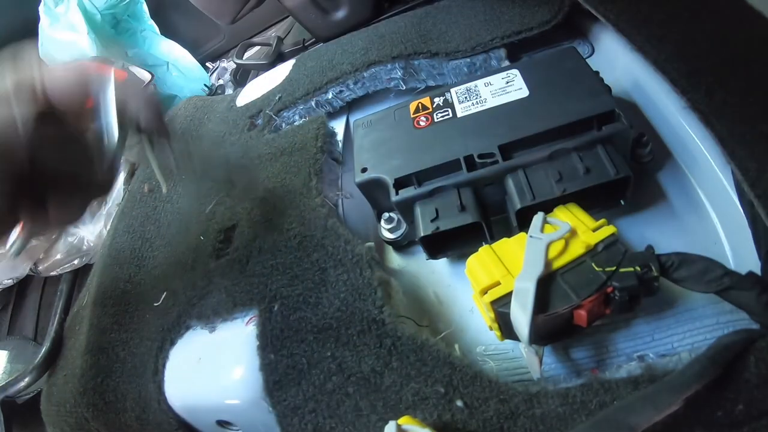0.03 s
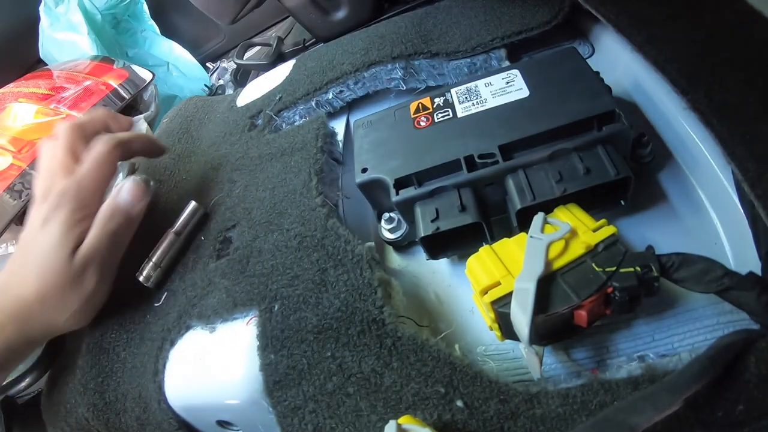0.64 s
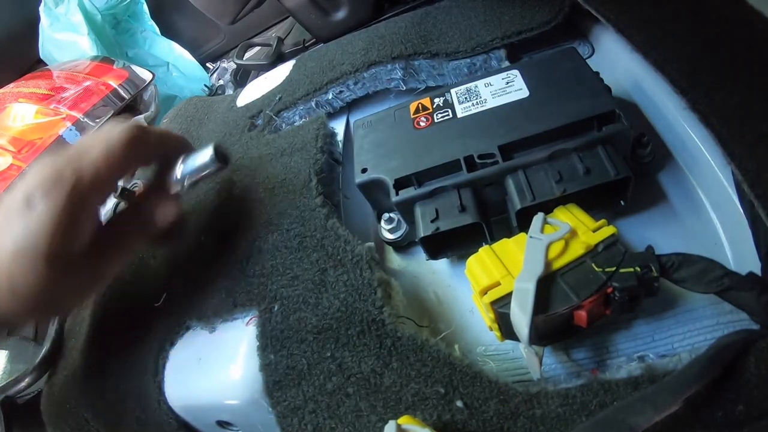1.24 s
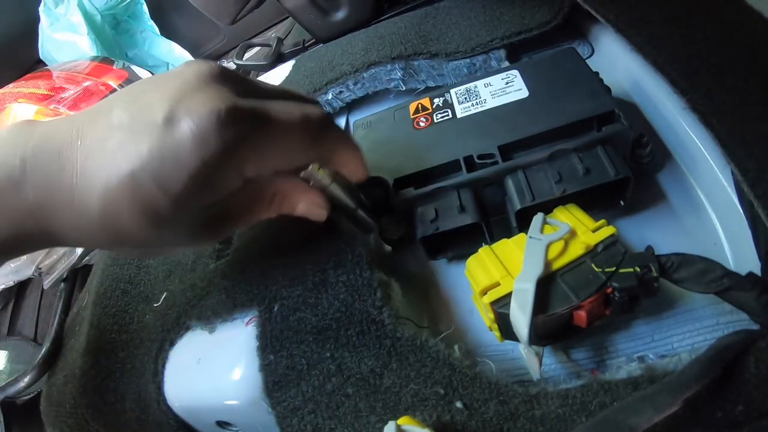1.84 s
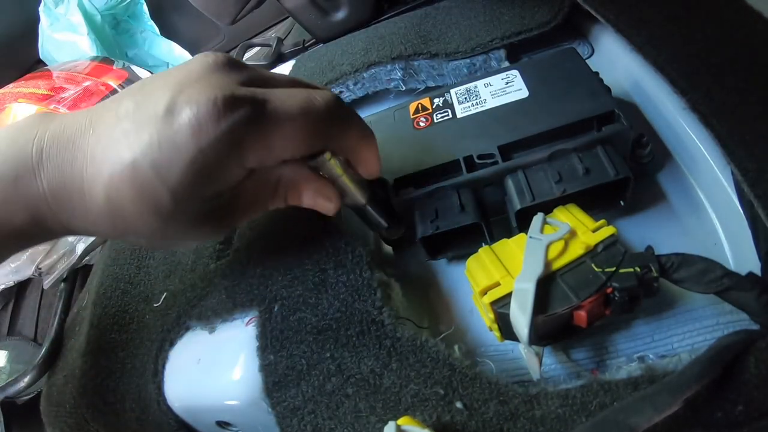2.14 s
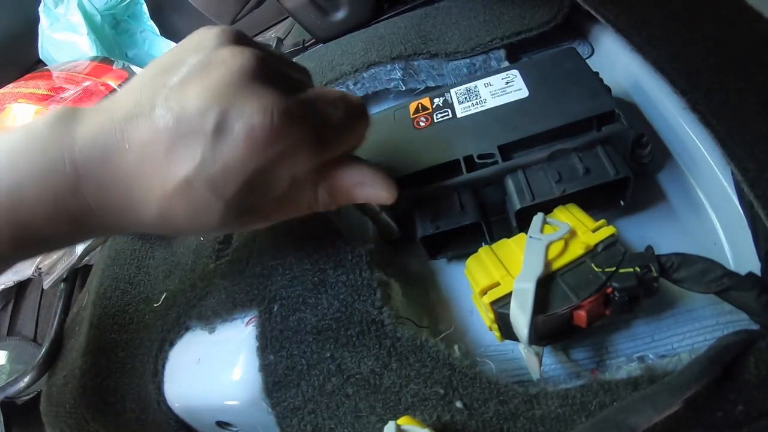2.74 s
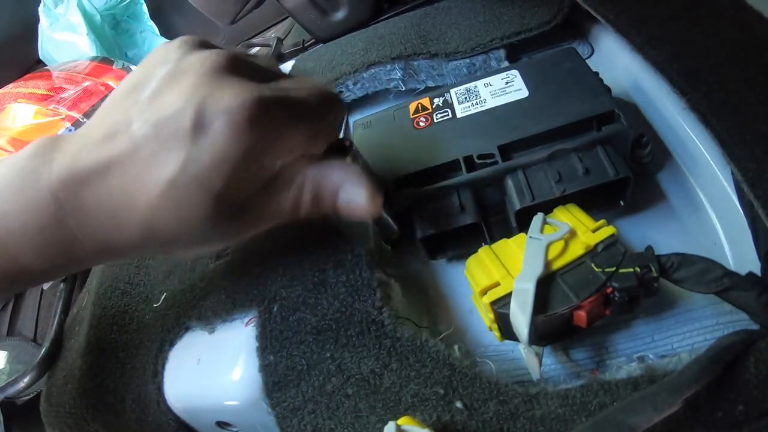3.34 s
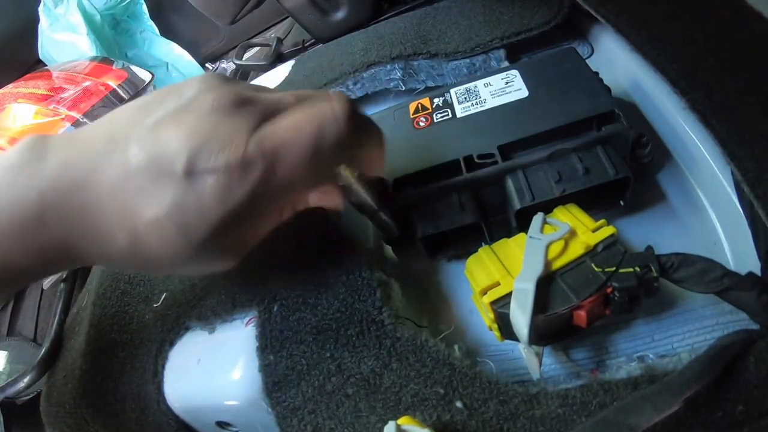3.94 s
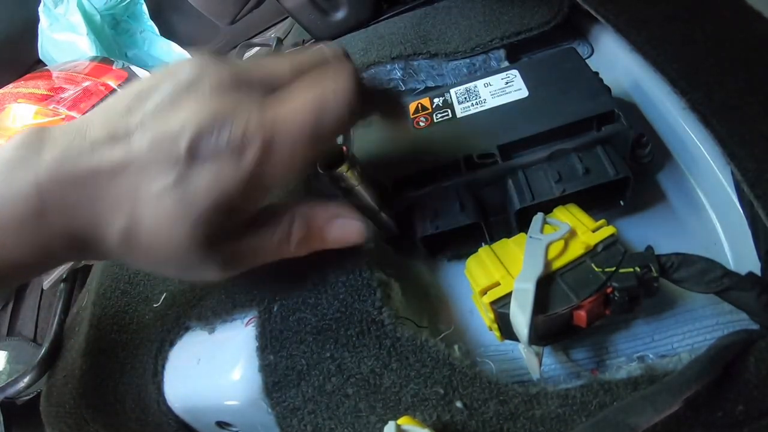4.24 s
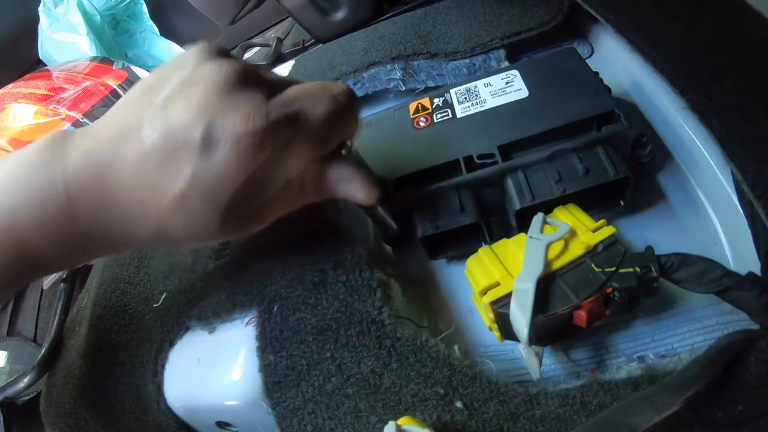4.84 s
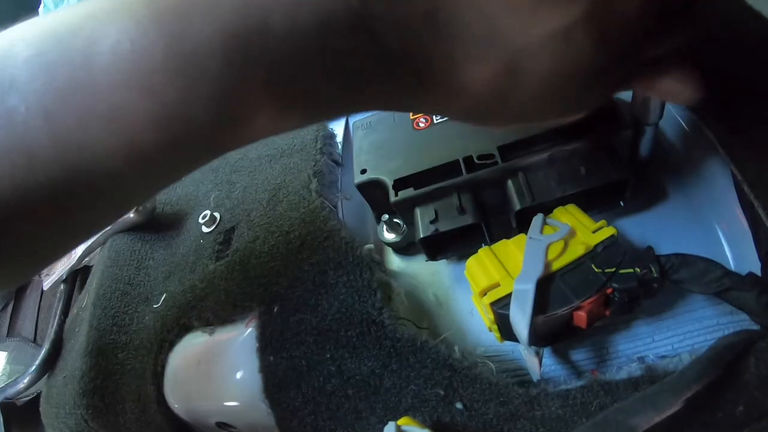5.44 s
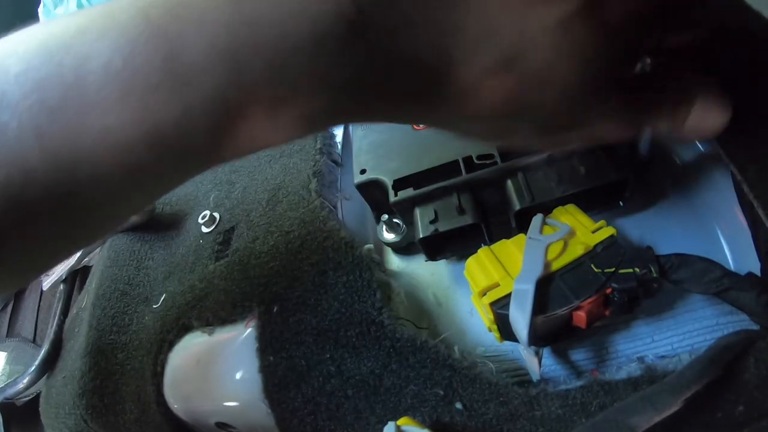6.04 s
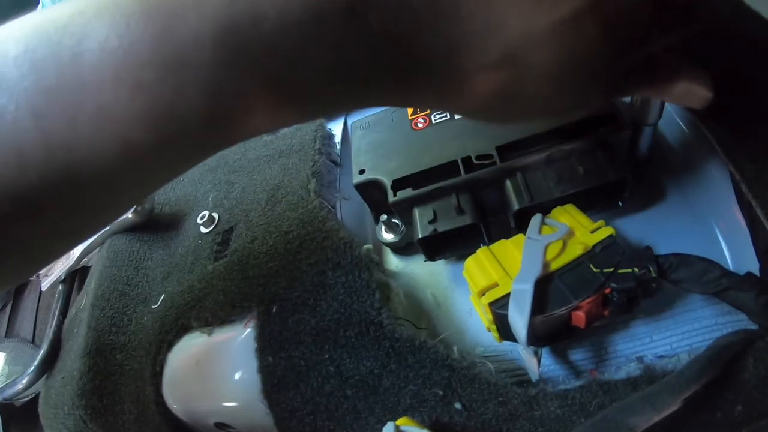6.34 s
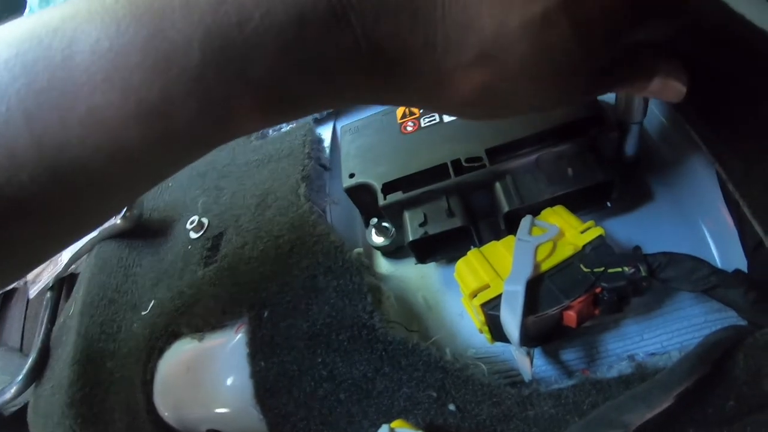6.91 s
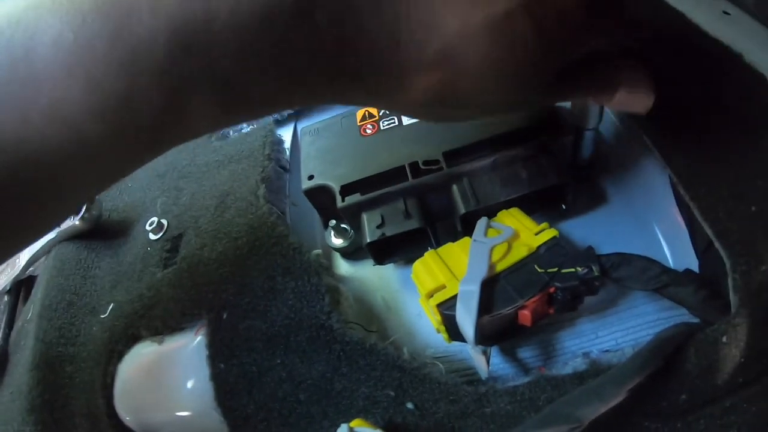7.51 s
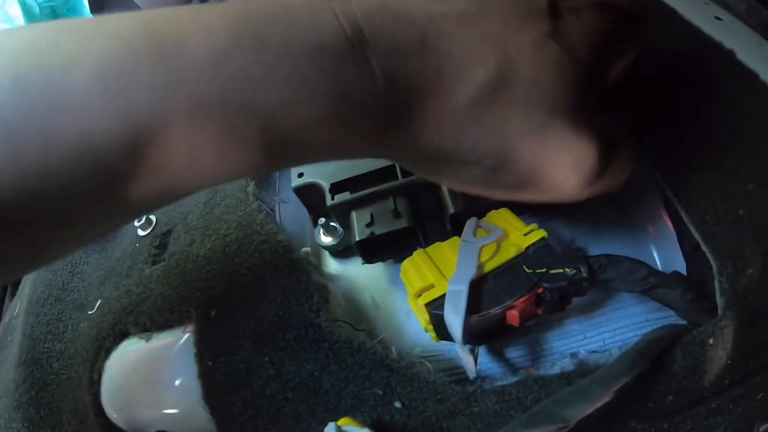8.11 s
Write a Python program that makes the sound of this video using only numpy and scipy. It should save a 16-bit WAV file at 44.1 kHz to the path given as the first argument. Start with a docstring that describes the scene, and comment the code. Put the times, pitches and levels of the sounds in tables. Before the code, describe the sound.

A steel socket and driver land on carpet with a low thud and a ringing clink, followed by small clinks and brushing from a hand. The loose socket then knocks and rattles on a nut, with a short scrape at each twist. A second nut follows, softer and duller, interrupted by a few bumps and snaps against the microphone. It is all close, inside a parked car with a faint low rumble.

```python
"""A loose steel socket knocks on a nut spun by hand on the floor pan of a parked car; the thread scrapes
at each twist. First the driver lands on the carpet and the socket clinks onto it; a second nut follows
further off. Each blow is a crack and a chatter that ring tool and floor; each scrape is a stream of
tiny slips. The hand brushes the carpet, the arm bumps the camera and the cabin booms faintly."""
import sys
import numpy as np
from scipy import signal
from scipy.fft import rfft, irfft
from scipy.io import wavfile
from scipy.ndimage import uniform_filter1d

SR = 44100
rng = np.random.default_rng(int(sys.argv[2]) if len(sys.argv) > 2 else 0)


def dump(signal):
    """Clip the signal to [-1, 1] and save it as 16-bit WAV at the path in sys.argv[1]."""
    limited = np.clip(np.atleast_2d(signal).T, -1, 1)
    pcm = np.round(limited * 32767).astype(np.int16)
    wavfile.write(sys.argv[1], SR, pcm)


N = 360297
TIME = np.arange(N) / SR
GRIP_DETUNE = 0.03  # the fingers shift the high modes by about this fraction

# Swell of the low end as the body shifts: time_s, relative_db
BODY_SHIFT = [(0.0, -57), (6.3, -65.5), (6.55, -65), (7.87, -63.5), (8.17, -59)]


def near_nut():
    """The socket rocks and rubs on the first nut, ringing the floor pan and the hand-damped tool."""
    # Knocks: start_s, strength_db, hardness_db_per_octave, panel_db
    knocks = [(1.895, -24.5, 0.4, -0.5), (1.93, -21, 2, -5.5), (1.944, -26, 0, -2), (1.971, -29, -1, -3.5),
              (2.04, -35.5, 1, 3.5), (2.072, -27.5, 2, -1), (2.174, -27.5, 2, 3.5),
              (2.207, -34.5, -1.5, -9), (2.234, -27, 1.5, -3.5), (2.265, -25, 1, 2),
              (2.306, -22.5, 0.1, -0.5), (2.364, -28.5, -1.3, 1), (2.391, -29.5, -3, 0.5),
              (2.43, -36.5, 0.2, -7), (2.6, -50.5, -2, 1.5), (2.631, -42.5, -3, -1.5),
              (2.692, -55.5, 3, -4), (2.793, -41, -0.9, 0), (2.935, -44.5, -1.7, 5.5),
              (3.073, -52.5, 1.5, -2), (3.095, -40, -4, -4), (3.152, -38, -2, 1), (3.24, -40.5, -1.5, -3),
              (3.265, -45.5, -4, 2.5), (3.432, -43, -2, -4.5), (3.532, -46.5, 0, 2.5),
              (3.545, -26, -1, -2.5), (3.553, -23.5, 0, 0), (3.662, -29, 0.93, -2.5),
              (3.84, -44, -1.4, -7.5), (3.87, -56.5, 2, 2.5), (3.962, -33.5, -1.1, -2),
              (4.013, -47, 2.5, 1), (4.25, -54, -3, 4), (4.271, -48.5, -5, 2), (4.365, -33, -0.5, 3),
              (4.372, -27, -2.2, 0.5), (4.477, -45.5, -2, 4.5), (4.497, -37.5, -0.9, -5.5),
              (4.529, -39, -3.5, 8), (4.584, -41, 0, 1.5), (4.666, -57.5, -4, 5), (4.692, -55, -5.5, 7),
              (4.75, -45.5, -1.5, 4.5), (4.758, -46, 2, -2), (4.77, -42, 0, 1), (4.854, -45, -0.5, 0),
              (4.869, -37, 2, 7), (4.884, -38, -1, 1), (4.912, -42, -0.5, 2.5), (5.046, -42.5, -2.5, -1),
              (5.151, -33.5, 0.4, 7), (5.163, -51.5, -4, 16), (5.226, -49.5, 0.5, 5),
              (5.265, -42.5, 1.1, 4), (5.288, -44, 0, 2), (5.317, -47.5, -2.7, 1.5),
              (5.393, -48, 1.5, -0.5)]
    # Thread and fingers rub at each twist: start_s, length_s, relative_db
    twists = [(2.67, 0.12, -43), (3.2, 0.066, -37.5), (3.59, 0.089, -40.5), (3.97, 0.15, -40.5),
              (4.35, 0.12, -44), (4.62, 0.1, -48.5), (4.78, 0.14, -43), (5.17, 0.15, -36.5),
              (5.45, 0.076, -37)]
    # Ring of the floor pan, and of the socket on its driver: pitch_hz, level_db, t60_s
    pan_modes = [(168.2, 9.5, 0.13), (242, 7.6, 0.019), (415.6, 6, 0.068), (554, 12.04, 0.14),
                 (643.4, 6.2, 0.064), (1120, 1.8, 0.18), (1176, 7.1, 0.07), (1315, 1.9, 0.096)]
    tool_modes = [(1675, 5, 0.18), (1907, 13, 0.058), (2910, 6, 0.14), (2997, 8.3, 0.077),
                  (3160, 6.3, 0.13), (2520, 6, 0.15), (3243, 6.7, 0.054), (4326, 7.9, 0.066),
                  (5400, 3.1, 0.06), (5460, 6.7, 0.12), (6520, 7.3, 0.041), (7250, 4.9, 0.059)]
    # Tone of the knock and of the rub: frequency_hz, gain_db
    knock_eq = [(53, -51.5), (90, -26.5), (157, -1.5), (231, 0.5), (347, -10), (555, -5), (928, -16),
                (1880, -14.5), (2950, -15.5), (3890, -28.5), (5250, -39), (9780, -51.5), (12200, -54.5),
                (15000, -75)]
    rub_eq = [(71, -53), (120, -8), (222, 5), (345, 0.5), (750, -9), (1190, -15), (1450, -17.5), (1910, -9),
              (2300, -23.5), (3200, -19.5), (7000, -55), (12500, -76), (14500, -64)]
    modes = pan_modes + tool_modes
    knocking = blows(knocks, modes, knock_eq, registers_db=(5.5, 1.5, -4, -9.5), chatter_s=0.0023,
                     wash_t60=0.083, tail_db=-18, tail_t60=0.2, tail_hz=1500)
    return knocking + thread(twists, modes, rub_eq, hiss_db=-20, ring_db=-12, rattle_db=-6)


def far_nut():
    """The socket rocks and rubs on the second nut, further off: softer and duller."""
    # Knocks: start_s, strength_db, hardness_db_per_octave, panel_db
    knocks = [(5.778, -41, 0.5, 6), (5.788, -34, -0.1, -2), (5.897, -37, 0.6, 8.5), (5.942, -33, 0.7, 6.5),
              (6.178, -33.5, 1, 2), (6.19, -38, -4.5, 5), (6.215, -33, 1.5, -5.5), (6.267, -44, -3.5, -0.5),
              (6.396, -44, -3.5, 2.5), (6.456, -31, 0.9, -2), (6.502, -42, -1, -4), (6.643, -31, 1, -5.5),
              (6.662, -49, 3.5, 6.5), (7.016, -46, -0.5, -4), (7.132, -43, 0.2, -2),
              (7.157, -37.5, -0.7, 4), (7.28, -46.5, 0.6, 5.5), (7.534, -48.5, -7.5, -4),
              (7.61, -41.5, -2.5, 0), (7.752, -43.5, 2, -1), (7.772, -34, -2, -1), (7.838, -39, 0, 4.5),
              (8.072, -37.5, -2.5, -9), (8.093, -40.5, 2, 2.5)]
    # Rub of each twist: start_s, length_s, relative_db
    twists = [(5.83, 0.11, -43.5), (6.18, 0.084, -41), (6.3, 0.089, -41.5), (6.78, 0.19, -50.5),
              (7.27, 0.14, -47), (7.42, 0.097, -36), (7.73, 0.21, -50), (7.86, 0.14, -43.5),
              (8.02, 0.13, -40.5)]
    # Ring of floor pan and tool: pitch_hz, level_db, t60_s
    modes = [(170, 2.5, 0.029), (227, 8.6, 0.094), (426.4, 7.9, 0.11), (543.5, 10.5, 0.1),
             (829, 1.9, 0.026), (1210, 10, 0.021), (1890, 6.3, 0.064), (2970, 12, 0.041), (4390, 5, 0.12)]
    # Tone of the knock and of the rub: frequency_hz, gain_db
    knock_eq = [(53, -44), (90, -16), (150, -1), (262, 8), (458, -12), (749, -5.5), (1100, -19.5),
                (1700, -17.5), (2950, -24), (5250, -43), (9570, -54.5), (12500, -68), (15000, -78)]
    rub_eq = [(71, -48.5), (120, -2.5), (205, 6.5), (290, -8.5), (445, -3), (700, -10.5), (1230, -18),
              (1600, -17.5), (2400, -24.5), (3200, -22), (4400, -30.5), (6000, -26.5), (11000, -51.5),
              (14500, -54)]
    knocking = blows(knocks, modes, knock_eq, registers_db=(1.5, -1.5, -10.5, -19), chatter_s=0.0053,
                     wash_t60=0.074, tail_db=-21.5, tail_t60=1.0, tail_hz=1650)
    return knocking + thread(twists, modes, rub_eq, hiss_db=-25, ring_db=-8, rattle_db=-11)


def blows(hits, modes, eq, registers_db, chatter_s, wash_t60, tail_db, tail_t60, tail_hz,
          grain_db=1, detune=GRIP_DETUNE):
    """Steel strikes and chatters: a crack, clear modes, a fast-dying wash and a dull cabin tail."""
    # The four registers of a blow (thud, knock, clank, tick): low_hz, high_hz
    registers = [(100, 380), (380, 1400), (1400, 4600), (4600, 15500)]
    octaves = np.log2(np.sqrt(np.prod(registers, axis=1)) / 1000)
    panel_share = np.array([0, 1, 0.5, 0])
    lead_in_s, hand_damping_db_per_s = 0.012, 177
    since_hit = np.arange(SR // 3) / SR - lead_in_s
    t, struck = np.maximum(since_hit, 0), since_hit >= 0
    attack = struck & (t < 0.025)
    fade = undb(-60 * np.maximum(t - chatter_s, 0) / wash_t60)
    crack = undb(-8) * signal.unit_impulse(len(t), np.argmax(struck))
    # a faint noise swells for 12 ms before each crack
    swell = np.where(struck, 1, undb(-6) * (1 + since_hit / lead_in_s) ** 2)
    swell = uniform_filter1d(swell, SR // 500)
    out = np.zeros(N)
    for start_s, strength_db, hardness_db, panel_db in hits:
        # the contact opens and closes about once a millisecond
        grain = undb(grain_db * np.repeat(noise(len(t)), SR // 1000)[:len(t)])
        tail = band(noise(len(t)), (330, tail_hz), order=1) * undb(tail_db - 60 * t / tail_t60)
        tail = band(tail, 4460, "lowpass", order=2)  # carpet and seats soak up the top
        wash = swell * (noise(len(t)) * fade * grain + tail)
        ringing = ring(modes, t, scatter_db=4, detune=detune)
        body = colour(crack + wash / np.linalg.norm(wash) + ringing, eq)
        # a harder contact is brighter; a square one drives the floor panel and sounds hollower
        levels_db = strength_db + np.array(registers_db) + hardness_db * octaves + panel_db * panel_share
        for edges, level_db in zip(registers, levels_db):
            damping = undb(-t * hand_damping_db_per_s * min(edges[0] / 4600, 1))
            part = band(body, edges) * damping
            add(out, start_s - lead_in_s, part * undb(level_db) / np.std(part[attack]))
    return out


def thread(twists, modes, eq, hiss_db, ring_db, rattle_db):
    """The turning nut catches and slips, ringing tool and pan; the ring shifts with the grip."""
    slips = friction(per_s=900, spread_db=0, smooth=1) * undb(2 * walk(90))
    slips = unit(slips + undb(rattle_db) * rattle())
    grip = walk(9)
    ringing = sum(share * resonate(slips, modes, GRIP_DETUNE) for share in (np.cos(grip), np.sin(grip)))
    return strokes(twists, slips + undb(ring_db) * ringing, eq, hiss_db, taper=0.2) * undb(-4)


def rattle(per_s=55, t60_s=0.013):
    """The loose socket ticks dully at uneven intervals, each tick a brief chatter."""
    gap, force = rng.random((2000, 2)).T
    onsets = (np.cumsum(2 * gap) / per_s * SR).astype(int)
    taps = np.zeros(N)
    taps[onsets[onsets < N]] = undb(8 * force[onsets < N])
    envelope = signal.fftconvolve(taps, undb(-60 * TIME[:SR // 10] / t60_s))[:N]
    return unit(band(envelope * noise(), 5000, "lowpass", order=2))


def tool_drops():
    """Socket and driver land on the carpeted floor: a low thud under ringing steel."""
    # Landings: start_s, strength_db, hardness_db_per_octave, panel_db
    landings = [(0.113, -47, -2.5, 11.5), (0.206, -38, -3, -7), (0.401, -18, 2, 6.5), (0.45, -26, 2.5, 0.5),
                (0.457, -27.5, 0.5, 5)]
    # Ring of floor and steel: pitch_hz, level_db, t60_s
    modes = [(172.8, 27.5, 0.14), (220, 25.5, 0.13), (505, 1, 0.23), (1651, 13, 0.11), (1880, 9, 0.099),
             (2120, 25.5, 0.97), (2580, 16.5, .05), (2780, 14, 0.035), (3270, 15, 0.084)]
    # Tone of a landing: frequency_hz, gain_db
    eq = [(53, -82), (90, -24), (231, -8), (298, -0.5), (339, -27.5), (448, -10), (852, -31), (3280, -34),
          (15000, -83)]
    return blows(landings, modes, eq, registers_db=(8.5, -4, -9.5, -23.5), chatter_s=0.007,
                 wash_t60=0.1, tail_db=-36, tail_t60=0.11, tail_hz=2540, grain_db=0, detune=0.0054)


def socket_on_driver():
    """The deep socket clinks against the driver and sings as steel drags over steel."""
    # Clinks: start_s, strength_db, hardness_db_per_octave, panel_db
    clinks = [(0.467, -54, 3.5, -2), (0.511, -60.5, 5, -3), (0.598, -49, 1.5, 4), (0.614, -31, 0.5, -1),
              (0.66, -42.5, -3.5, -6.5), (0.697, -48, -3, 1), (0.856, -56.5, -7.5, 8),
              (0.924, -42.5, -2.5, 5)]
    # Drags: start_s, length_s, level_db
    drags = [(0.47, 0.041, -48.5), (0.56, 0.09, -41), (0.875, 0.022, -35.5), (1.1, 0.053, -47.5),
             (1.585, 0.021, -48), (7.74, 0.018, -35.5)]
    # Ring of the socket: pitch_hz, level_db, t60_s
    modes = [(1187, 17, 0.04), (1798, 15, 0.12), (2060, 24, 0.55), (2482, 28, 0.12), (2616, 18, 0.16),
             (3208, 28, 0.08), (4290, 27, 0.09), (5620, 15, 0.15), (6261, 19, 0.1), (11160, 18, 0.027)]
    # Tone of the socket: frequency_hz, gain_db
    eq = [(53, -46), (90, -5.5), (164, 3), (870, -27), (1130, -23), (3280, -17.5), (15000, -45)]
    clinking = blows(clinks, modes, eq, registers_db=(2.5, 4.5, 8.5, -1.5), chatter_s=0.0032,
                     wash_t60=0.07, tail_db=-28, tail_t60=0.22, tail_hz=2510, grain_db=2, detune=0.003)
    slips = friction(per_s=1500, spread_db=0, smooth=0.5)
    singing = slips + undb(-16.5) * resonate(slips, modes)
    return clinking + strokes(drags, singing, eq, hiss_db=-47, taper=0.67)


def landing_swell(start_s=0.37, length_s=0.035, level_db=-33):
    """A brief narrow-band noise near 1.9 and 3.4 kHz swells into the loudest landing."""
    # Bands of the swell: low_hz, high_hz, relative_db
    noise_bands = [(1800, 2050, 0), (3250, 3650, -9)]
    count = int(length_s * SR)
    narrow = sum(undb(db) * unit(band(noise(), (low, high), order=2)) for low, high, db in noise_bands)
    swell = np.linspace(0, 1, count) ** 2 * signal.windows.tukey(count, 0.2)
    out = np.zeros(N)
    add(out, start_s, undb(level_db) * unit(narrow[-count:] * swell))
    return out


def carpet_brush():
    """Hand, steel and arm brush the carpet fibres with wandering pressure."""
    # Slides: start_s, length_s, level_db
    slides = [(-0.12, 0.24, -48.5), (0.38, 0.13, -39.5), (0.53, 0.15, -41.5), (0.66, 0.16, -58.5),
              (0.85, 0.047, -42), (0.95, 0.27, -56), (1.28, 0.15, -48.5), (1.44, 0.11, -53),
              (1.56, 0.097, -59), (1.7, 0.16, -57.5)]
    # Tone of the pile: frequency_hz, gain_db
    eq = [(240, -36), (400, -6), (725, 6.5), (948, -3), (1130, 2), (1750, -4), (2770, -4), (4800, -11),
          (6460, -41), (14000, -88.5)]
    arm_creep = (6.26, 2.4, -65)  # one long, faint slide
    fibres = friction(per_s=2500, spread_db=2, smooth=0.8) * undb(1.3 * walk(28))
    return strokes(slides + [arm_creep], fibres, eq, hiss_db=-18, taper=0.42)


def arm_bumps():
    """Dull shoves reach the microphones through the camera body, mostly on the left."""
    # Shoves: start_s, length_s, level_db, left_over_right_db
    shoves = [(0.118, 0.05, -33.5, 0), (0.198, 0.041, -27, 0), (1.405, 0.057, -35, 0),
              (3.025, 0.15, -32.5, 4), (6.657, 0.071, -36, 12), (6.712, 0.061, -26.5, 16),
              (6.771, 0.04, -25.5, 20)]
    out = np.zeros((2, N))
    for start_s, length_s, level_db, left_db in shoves:
        rumble = band(noise(), 6.1 / length_s, "lowpass", order=2)  # the shorter, the brighter
        rumble = band(rumble, 11, "highpass", order=2)
        count = int(length_s * SR)
        shove = unit(rumble[-count:] * signal.windows.tukey(count, 0.5))
        add(out, start_s, undb([[level_db + left_db / 2], [level_db - left_db / 2]]) * shove)
    return out


def housing_ticks(t60_s=0.028):
    """The arm catches on the camera's housing: dry snaps with no ring."""
    # Snaps: start_s, level_db
    snaps = [(6.727, -42), (6.782, -34), (6.875, -37.5)]
    # Tone of the housing: frequency_hz, gain_db
    eq = [(200, 7), (600, 11), (2000, -7.5), (5000, -13), (9000, -17), (13000, -35), (15500, -40)]
    out, t = np.zeros(N), TIME[:SR // 30]
    for start_s, level_db in snaps:
        snap = colour(noise(len(t)) * undb(-60 * t / t60_s), eq)
        add(out, start_s, undb(level_db) * snap / np.std(snap[:SR // 100]))
    return out


def handling_rumble():
    """Low, restless rumble as the camera is moved."""
    return unit(band(noise(), (26, 70), order=2)) * undb(curve(BODY_SHIFT) + 8 + 11 * np.tanh(walk(10)))


def cabin_boom():
    """The car's interior booms faintly and swells a little as the body shifts."""
    # Tone of the cabin: frequency_hz, gain_db
    eq = [(25, -0.5), (105, -17.5), (160, 1), (230, -4.5), (330, -13), (550, -20), (1000, -28),
          (1900, -34.5), (2400, -42.5), (5000, -48), (10000, -61.5), (14000, -77.5)]
    shift_db = curve(BODY_SHIFT)
    swell_db = 0.91 * (shift_db - shift_db.mean())
    return unit(colour(noise(), eq)) * undb(-46 + swell_db + 0.25 * walk(5.3))


def stereo_side(x, lead_s, scatter_db, pocket_db):
    """Side signal: the right hears x first, panels scatter it, and a hollow dulls the left."""
    t = TIME[:SR // 40]
    echoes = noise(len(t)) * undb(-60 * t / 0.04) * (t > 0.002)
    scattered = signal.fftconvolve(x, echoes / np.linalg.norm(echoes))[:N]
    scattered = colour(scattered, [(150, -14), (600, -3), (2200, -2), (4500, 1), (9000, 9), (13000, 12)])
    late, early = (np.interp(TIME + shift, TIME, x) for shift in (-lead_s / 2, lead_s / 2))
    hollow = undb(-14) * band(x, (230, 380), order=1) - band(x, (760, 1127), order=1)
    return (late - early) / 2 + undb(scatter_db) * scattered + undb(pocket_db) * hollow


def friction(per_s, spread_db, smooth):
    """Dense tiny slips of uneven size over a smooth hiss."""
    size = undb(spread_db * np.minimum(rng.exponential(size=N), 4))
    slips = (rng.random(N) < per_s / SR) * noise() * size
    return unit(unit(slips) + smooth * noise())


def strokes(moves, slips, eq, hiss_db, taper, release_s=0.028):
    """Friction swells and fades with each movement: a coloured scrape with a fine hiss on top."""
    scrape = colour(slips, eq)
    scrape /= np.std(band(scrape, (400, 4000)))
    hiss = band(slips, (4500, 12500), order=5)
    hiss = unit(band(hiss, 7600, "lowpass", order=1))
    envelope = np.zeros(N)
    for start_s, length_s, level_db in moves:
        swell = undb(level_db) * signal.windows.tukey(int(length_s * SR), taper)
        add(envelope, max(start_s, 0), swell[int(max(-start_s, 0) * SR):])
    envelope = band(envelope, 1 / (2 * np.pi * release_s), "lowpass", order=1)
    return envelope * (scrape + undb(hiss_db) * hiss)


def ring(modes, t, scatter_db=0, detune=0):
    """Damped modes, each peaking its dB above a flat response; the grip shifts the high ones most."""
    hz, db, t60 = np.transpose(modes)[:, :, None]
    decay = np.log(1000) / t60
    looseness = np.minimum(hz / 2000, 1)
    hz = hz * (1 + detune * looseness * noise(hz.shape))
    gain = undb(db + scatter_db * looseness * noise(db.shape)) * 2 * decay / SR
    return np.sum(gain * np.exp(-decay * t) * np.sin(2 * np.pi * hz * t), axis=0)


def resonate(x, modes, detune=0):
    """The ring that x wakes in the modes."""
    return signal.fftconvolve(x, ring(modes, TIME[:SR // 3], detune=detune))[:N]


def colour(x, eq, size=4096):
    """Minimum-phase equaliser through (Hz, dB) points."""
    hz, db = np.transpose(eq)
    bins_hz = np.arange(size // 2 + 1) * SR / size
    gain = undb(np.interp(np.log(bins_hz + 1), np.log(hz), db))
    cepstrum = irfft(np.log(gain))
    cepstrum[1:size // 2] *= 2
    cepstrum[size // 2 + 1:] = 0
    return signal.fftconvolve(x, irfft(np.exp(rfft(cepstrum))))[:len(x)]


def band(x, hz, kind="bandpass", order=3):
    """Causal Butterworth filter."""
    return signal.sosfilt(signal.butter(order, hz, kind, fs=SR, output="sos"), x)


def walk(rate_hz):
    """Smooth random drift of rms 1."""
    hold = int(SR / rate_hz)
    steps = np.repeat(noise(N // hold + 1), hold)
    return unit(uniform_filter1d(uniform_filter1d(steps, hold), hold)[:N])


def noise(shape=N):
    """White noise."""
    return rng.standard_normal(shape)


def curve(points):
    """Straight lines through (time, value) points."""
    return np.interp(TIME, *np.transpose(points))


def add(out, start_s, x):
    """Mix x into out from start_s on."""
    i = int(start_s * SR)
    out[..., i:i + x.shape[-1]] += x[..., :N - i]


def undb(db):
    """Decibels to gain."""
    return 10 ** (np.asarray(db) / 20)


def unit(x):
    """Scale to rms 1."""
    return x / np.sqrt(np.mean(x ** 2))


def scene():
    """Everything sits in the middle; the nuts and the rumble spread out, and the bumps lean left."""
    # The stereo image opens and closes: time_s, width_ratio
    width = [(1.7, 0), (2.3, .7), (3.5, 1), (6.85, 1), (7.0, 0)]
    tools = tool_drops() + socket_on_driver() + landing_swell()
    near, far = near_nut(), far_nut()
    mid = near + far + tools + carpet_brush() + housing_ticks() + handling_rumble() + cabin_boom()
    side = stereo_side(near, lead_s=20e-6, scatter_db=-5.5, pocket_db=-3)
    side += stereo_side(far, lead_s=30e-6, scatter_db=-3, pocket_db=-2)
    side += handling_rumble()  # part of the rumble shakes each microphone on its own
    side *= curve(width)
    return np.array([mid + side, mid - side]) + arm_bumps()


def record(dry):
    """Soft saturation rounds the highest peaks; a steep low-pass cuts the top."""
    rounded = np.tanh(0.89 * dry) / 0.72
    return signal.sosfilt(signal.ellip(8, 0.2, 70, 15700, fs=SR, output="sos"), rounded)


dry = scene()
out = record(dry)
dump(out)
```